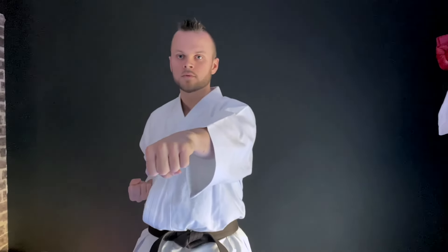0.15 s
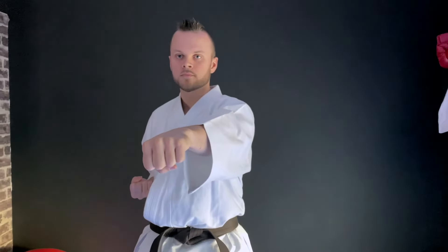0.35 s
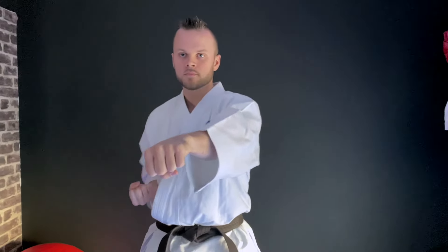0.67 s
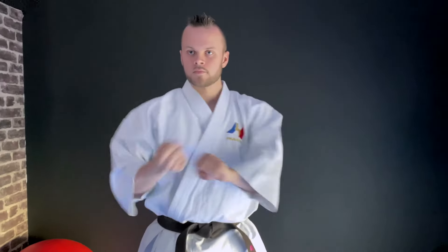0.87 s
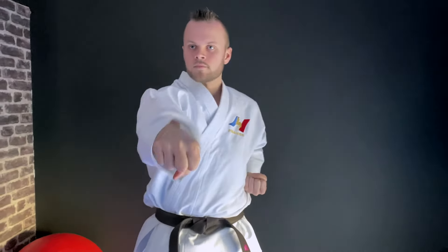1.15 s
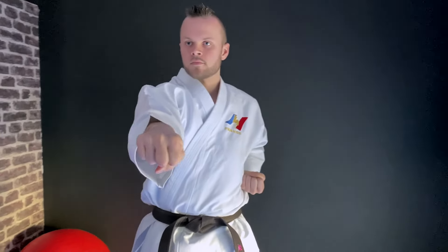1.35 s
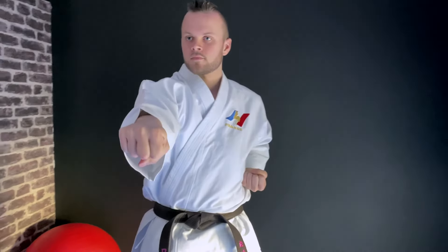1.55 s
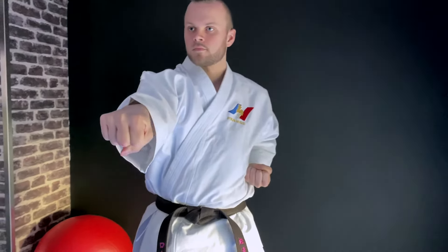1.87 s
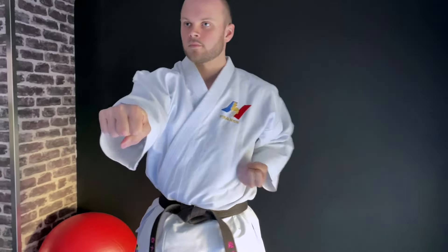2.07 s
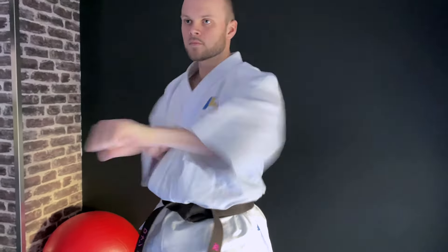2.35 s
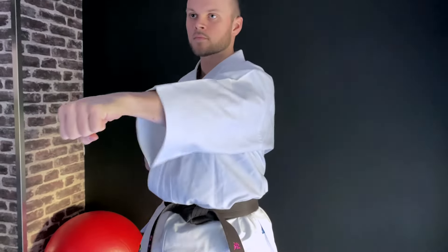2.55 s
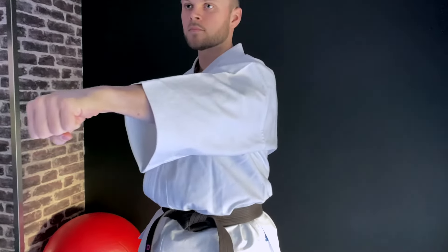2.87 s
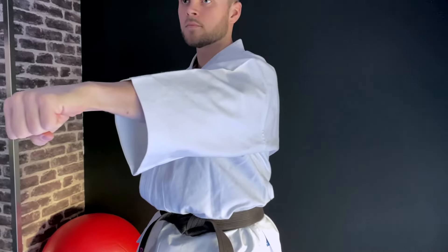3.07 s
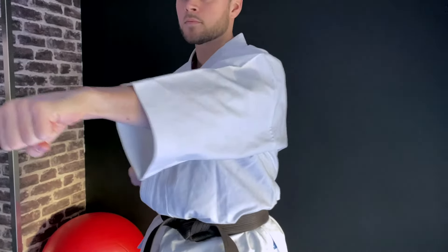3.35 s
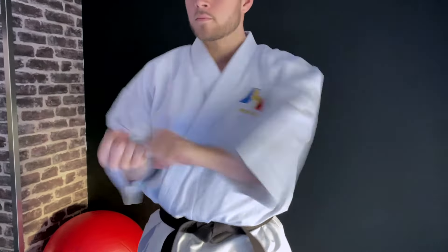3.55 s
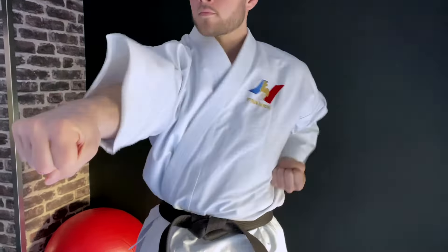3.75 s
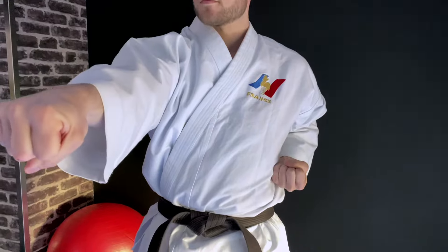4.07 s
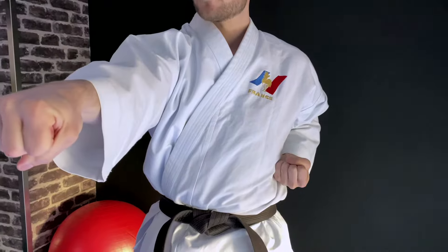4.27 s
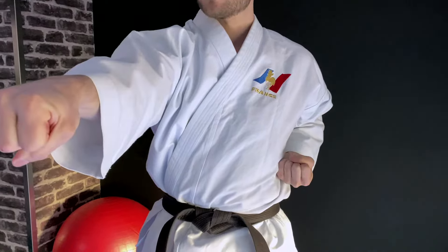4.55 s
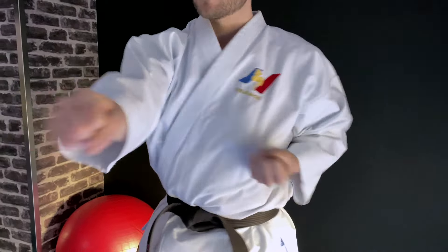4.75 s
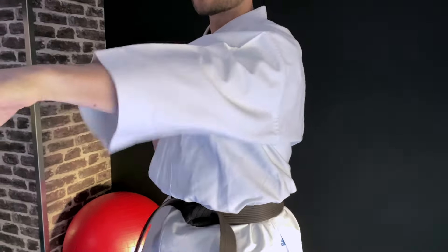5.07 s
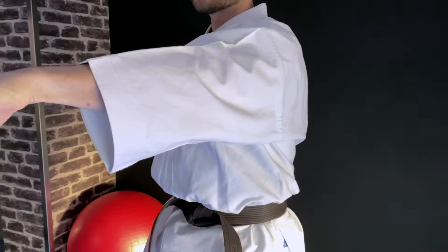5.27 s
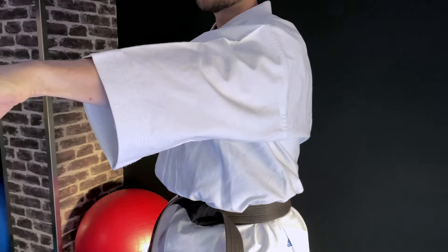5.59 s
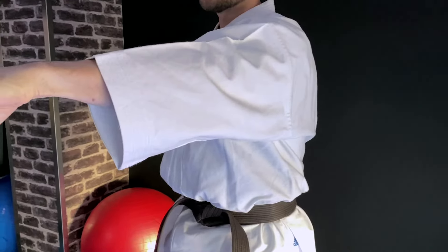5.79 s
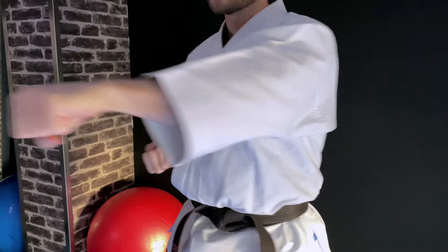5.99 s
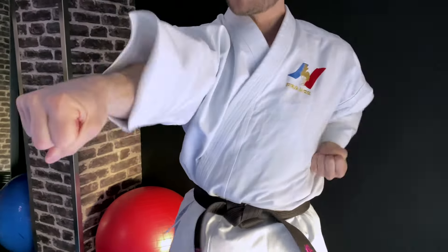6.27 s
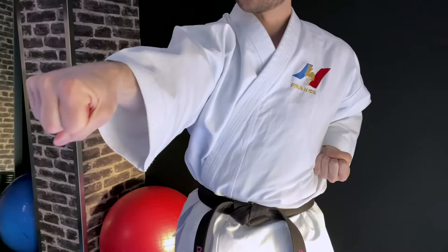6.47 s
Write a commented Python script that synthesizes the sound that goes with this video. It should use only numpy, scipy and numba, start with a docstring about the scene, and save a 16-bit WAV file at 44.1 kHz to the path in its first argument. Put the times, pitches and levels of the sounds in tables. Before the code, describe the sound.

Close up in a small, dull-sounding padded room, stiff cotton sleeves swish through five separate punches about a second or more apart. Each begins as coarse rubbing, swells fast, and ends in flapping folds and a dry snap with a soft low thump. Small rustles follow some of the punches. The fourth is the loudest, with hard pops and a deeper thud; quiet low rumble and recorder hiss fill the gaps.

```python
"""Five punches in a stiff cotton uniform, close by in a small padded room, over low rumble and recorder's hiss.
In each the weave rubs as dense coloured grains, sleeve folds flap and pop as damped sines, the arm scuffs through
gliding resonances, band-limited bursts snap or scuff, and damped low sines thump or make the rumble lumpier.
After the first punch faint thin tones pass; small shifts of pose rustle after the second, third and fourth.
The fourth punch brings the loudest pops and thump; the fifth settles into the rumble and hiss."""
import sys
import numpy as np
from scipy import signal
from scipy.fft import rfft, irfft
from scipy.io import wavfile
from scipy.ndimage import uniform_filter1d
from numba import njit

SR = 44100
rng = np.random.default_rng(int(sys.argv[2]) if len(sys.argv) > 2 else 0)


def unload_audio(sound):
    """Save the sound as a 16-bit wav file, at the path given as the first command line argument."""
    columns = np.transpose(np.atleast_2d(sound))
    # keep every value between -1 and 1, then stretch to whole-number steps
    steps = np.round(np.clip(columns, -1, 1) * 32767)
    wavfile.write(sys.argv[1], SR, steps.astype(np.int16))


N = 292383
T_S = np.arange(N) / SR

# arm speed per punch, as level of coarse rubbing: (time [s], level [dB])
ARM_SPEED = [
    [(0, -71), (.21, -95.5), (.52, -65.5), (.77, -52), (.83, -45), (.97, -42), (1.04, -42), (1.1, -48.5),
     (1.23, -62.5), (1.6, -77.5)],
    [(1.86, -80), (2.04, -57), (2.2, -49.5), (2.27, -47.5), (2.31, -39), (2.41, -36.5), (2.45, -41.5),
     (2.6, -58), (2.79, -76)],
    [(3.2, -88), (3.25, -69), (3.37, -55), (3.47, -50), (3.55, -39), (3.6, -35), (3.67, -38.5),
     (3.78, -49.5), (4.09, -79)],
    [(4.52, -84), (4.63, -56), (4.74, -48), (4.83, -41.5), (4.86, -35), (4.89, -33), (4.92, -39),
     (4.96, -33.5), (5.01, -42), (5.12, -53), (5.45, -82)],
    [(5.7, -80.5), (5.92, -55.5), (6.0, -54), (6.06, -43.5), (6.15, -40), (6.21, -36.5), (6.26, -42),
     (6.45, -60), (6.63, -75.5)],
]
# treble of the fine fibres per punch: (time [s], level [dB])
FIBRE_LEVEL = [
    [(0.3, -90), (0.606, -65), (0.78, -60.5), (0.826, -55.5), (1.038, -54.5), (1.338, -82), (1.4, -87)],
    [(1.87, -81), (2.06, -59.5), (2.248, -59), (2.316, -50.5), (2.394, -51.5), (2.624, -76), (2.72, -85)],
    [(3.2, -91), (3.304, -67.5), (3.448, -61), (3.564, -51.5), (3.628, -43.5), (3.85, -68.5), (4.05, -91)],
    [(4.52, -94), (4.628, -59), (4.712, -52.5), (4.842, -54), (4.904, -46.5), (4.974, -50.5), (5.25, -82)],
    [(5.75, -86), (5.84, -71), (6.18, -48.5), (6.194, -50), (6.232, -48.5), (6.282, -58.5), (6.55, -80)],
]
# phases of each punch: (thrust [s], full stretch [s],
#   folds in wind-up, at thrust, at stretch, settling [dB re rubbing at middle speed], tight weave in the same four [dB])
PUNCHES = [(0.815, 1.04, 1, 0, 2.6, 0, -7, -6.5, -4.5, -5.5),
           (2.303, 2.424, 1, 0.5, 0.83, -2, -4, -2, -3.5, -4.5),
           (3.562, 3.67, 3, 0.5, 3, 1, -4.5, -2.5, 0.5, -3.5),
           (4.831, 4.945, -2.5, -2, 3, 1, -3, -8, -0.5, -3),
           (6.054, 6.22, 1, 2.5, 1.9, 0.71, -5, -4.5, -4, -8)]
# small shifts of the held pose: (time [s], rise [s per 20 dB], fall [s per 20 dB],
#   rubbing [dB], folds [dB], tight weave [dB], fibres [dB])
POSE_SHIFTS = [(2.82, .025, .15, -69, -57.5, -72, -67.5), (4.27, 0.38, .15, -67.5, -79, -70.5, -74.5),
               (5.333, 0.026, 0.03, -83, -61, -76.5, -70)]
# folds popping open: (table time [s], peak [dB], starting pitch [Hz], decay to 1/e^2 [cycles])
FLAPS = [(0.799, -36, 654, 1.4), (0.819, -32.5, 810, 2.8), (0.929, -34.5, 510, 3.6),
         (0.964, -24.5, 295, 1.2), (0.977, -26.5, 620, 4.1), (1.019, -27, 607, 4.3),
         (1.039, -30.5, 730, 2.5), (2.226, -25, 530, 2.6), (2.26, -23, 466, 2.4), (2.343, -27, 500, 5.7),
         (2.384, -26, 224, 1.6), (2.82, -53, 473, 4.2), (2.845, -53, 520, 4), (3.335, -46, 300, 3.5),
         (3.375, -45, 280, 3.5), (3.403, -45, 416, 3.2), (3.546, -35.5, 410, 1.8), (3.61, -30, 596, 3.4),
         (3.689, -38, 590, 2.8), (3.754, -31.5, 670, 4.1), (3.798, -32.5, 433, 4.1),
         (4.812, -25.5, 450, 3.8), (4.846, -31.5, 641, 2.5), (4.932, -16, 428, 2.7),
         (4.944, -18.5, 288, 1.2), (4.955, -15, 660, 1.4), (4.99, -25, 196, 2), (5.196, -41, 413, 1.6),
         (6.029, -35, 727, 2.1), (6.064, -29, 715, 2.3), (6.088, -30, 426, 3.8), (6.114, -32, 506, 3.4),
         (6.149, -28, 470, 2.2), (6.179, -29, 670, 1.8), (6.231, -20, 795, 1.9), (6.406, -31.5, 760, 1)]
# short bursts of cloth, broad ones snap, narrow ones scuff:
#   (table time [s], peak [dB], centre [Hz], width [octaves], decay to 1/e [ms])
BURSTS = [(1.0263, -35, 2600, 3.1, 1.8), (2.2961, -25.5, 1550, 0.27, 7.4), (2.3105, -29, 1520, 0.3, 3.8),
          (2.3295, -28, 3670, 0.29, 3.7), (2.401, -20, 2580, 0.76, .8), (2.4282, -34, 2500, 1.2, 1.1),
          (2.7991, -48, 8000, 1.2, 3.1), (3.531, -44, 2300, 0.9, 2.3), (3.5511, -28, 2100, 1.2, 2.6),
          (3.599, -29, 2400, 1.1, 3.7), (3.6564, -25, 3200, 1.35, 2.9), (4.8494, -26.5, 2470, 0.56, 1.8),
          (4.8792, -19, 2780, 0.83, 3), (4.9628, -19, 1510, 2.6, 1.3), (4.9906, -18, 890, 0.83, 0.75),
          (5.3235, -52, 5500, 2.1, 3.1), (6.2018, -23, 1600, 1.8, 0.51), (6.229, -25, 1470, 1, 1.3)]
# arm sliding through the sleeve, the air gap ringing: (start [s], length [s], first [Hz], last [Hz], level [dB])
SCUFFS = [(0.782, 0.074, 556, 1120, -38), (0.838, 0.064, 1290, 2270, -42.5),
          (2.295, 0.036, 1600, 1600, -51), (2.815, 0.051, 6000, 7000, -79), (3.4, 0.065, 424, 390, -47),
          (3.577, 0.053, 2300, 2680, -31), (4.667, 0.058, 680, 680, -43.5), (4.723, 0.044, 450, 470, -38.5),
          (4.753, 0.07, 890, 2000, -40.5), (4.845, 0.075, 1500, 3600, -35),
          (5.32, 0.039, 4000, 4250, -68.5), (6.02, 0.081, 680, 960, -43)]
# low thumps and lumps in the rumble: (table time [s], peak [dB], starting pitch [Hz], decay to 1/e^2 [cycles])
THUMPS = [(0.908, -45, 96.9, 3.0), (0.93, -41, 56.5, 4.6), (1.178, -49, 72.7, 2.7),
          (1.321, -48.5, 114, 2.6), (1.419, -46, 37, 2.1), (1.529, -54, 37.2, 2.7), (1.654, -44, 65, 3.7),
          (1.719, -47, 71.4, 1.9), (1.675, -45, 55, 2.0), (1.907, -46.5, 64.6, 6), (1.965, -46, 55, 2.0),
          (2.105, -46, 40, 2.0), (2.025, -37.5, 60.4, 2), (2.334, -37, 80, 2.7), (2.719, -49, 38, 3.0),
          (2.769, -46.5, 57, 2.9), (2.819, -53, 45.8, 2.8), (3.119, -46.5, 40.7, 2.3),
          (3.18, -55, 48.7, 2.3), (3.249, -50, 45.8, 2.2), (3.589, -43, 128, 4), (4.316, -41, 58, 3),
          (4.915, -23, 96.3, 6.3), (4.949, -35, 69.5, 3.8), (5.45, -53.5, 67, 2.2), (6.089, -33, 129, 3.3),
          (6.227, -33.5, 71.4, 1.9)]
# floor rumble, swelling around the punches; a part following the rubbing is added: (time [s], level [dB])
RUMBLE_LEVEL = [(0.0, -70), (0.81, -66), (1.03, -46), (1.09, -52), (2.31, -60), (2.36, -47), (2.62, -68),
                (2.79, -54.5), (2.92, -63.5), (3.67, -53.5), (4.1, -69.5), (4.32, -58.5), (4.63, -66),
                (4.95, -47), (5.22, -66), (5.76, -71), (6.22, -51), (6.63, -73.5)]
# faint thin tones: (start [s], length [s], first [Hz], last [Hz], level before the envelope [dB])
TONES = [(1.326, 0.45, 906, 890, -75), (1.59, .09, 2800, 2860, -86), (1.67, .06, 2860, 2900, -73)]
# relative spectra of coarse weave, tight weave, folds, fibres, floor, hiss: (frequency [Hz], density [dB per Hz])
WEAVE_SPECTRUM = [(650, 3.5), (1150, 3.5), (2050, 1.5), (2700, -6), (3400, -37)]
TIGHT_SPECTRUM = [(2300, -7), (2900, -1), (3500, -1), (4150, -0.2), (4650, -4.5), (5200, -9), (6600, -17.5)]
FOLD_SPECTRUM = [(90, -2), (170, 0), (300, 2), (480, 2), (750, -2), (1100, -10), (1600, -11)]
FIBRE_SPECTRUM = [(4000, -4), (5500, -10), (8000, -9.5), (11000, -16), (15500, -18)]
FLOOR_SPECTRUM = [(15, 14), (30, -2.5), (55, 2), (90, -6.5), (160, -18), (400, -33)]
HISS_SPECTRUM = [(88, -43), (150, 0), (359, -9.5), (530, -12.5), (751, -14), (1000, -13.5), (1420, -15.5),
                 (15500, -26)]

MIDDLE_DB = -50  # rubbing at middle speed
FOLDS_GROW_DB_PER_DB, TIGHT_GROW_DB_PER_DB = 0.12, -.05  # gain re rubbing per dB of speed
BLEND_S = 0.044  # wind-up to thrust, stretch to settling
FLAP_DELAY_S = 0.00296  # table time to start of sound
SCUFF_Q = 7.2
ROOM_T60_S, ROOM_DB, ROOM_HZ = 0.38, -15.5, 5070
SWAY_DB, SWAY_GROW_DB_PER_DB = -65.5, 0.58  # rumble following the rubbing: at middle speed; growth with speed
HISS_DB, TOP_HZ = -70, 15710


def arm():
    """Speed and phase set rubbing, folds and tight weave; fibres follow their own curve; pose shifts add to all."""
    gains = np.zeros((4, N))
    for speed_curve, fibre_curve, (thrust_s, stretch_s, *phase_db) in zip(ARM_SPEED, FIBRE_LEVEL, PUNCHES):
        rub_db = fading(speed_curve)
        speed_db = rub_db - MIDDLE_DB
        phases_s = [thrust_s - BLEND_S, thrust_s, stretch_s, stretch_s + BLEND_S]
        folds_db, tight_db = (np.interp(T_S, phases_s, db) for db in np.reshape(phase_db, (2, 4)))
        folds_db = rub_db + folds_db + FOLDS_GROW_DB_PER_DB * speed_db
        tight_db = rub_db + tight_db + TIGHT_GROW_DB_PER_DB * speed_db
        gains += undb([rub_db, folds_db, tight_db, fading(fibre_curve)])
    for s, rise_s, fall_s, *peak_db in POSE_SHIFTS:
        drop_db = 20 * np.maximum((s - T_S) / rise_s, (T_S - s) / fall_s)
        gains += undb(np.array(peak_db)[:, None] - drop_db)
    return gains


def sleeves(gains):
    """Stick-slip of weave, folds and fibres: coloured grains, each patchy in its own way."""
    drag = walk(45)  # shared: the sleeve catches and lets go
    slips = grains(2500, 5.6, 1.0)
    coarse = colour(slips, WEAVE_SPECTRUM) * undb(0.74 * drag + 0.71 * walk(90))
    tight = colour(slips, TIGHT_SPECTRUM) * undb(0.49 * drag + 1.2 * walk(80))
    folds = colour(grains(400, 7.3, 1.0), FOLD_SPECTRUM) * undb(1.8 * drag + 0.6 * walk(35))
    fibres = colour(grains(5000, 7.3, 4.1), FIBRE_SPECTRUM) * undb(0.11 * drag + 0.64 * walk(70))
    return np.sum(gains * np.array([coarse, folds, tight, fibres]), axis=0)


def scuffs():
    """Slips ring the air gap of the sleeve: a gliding resonance, swelling and fading with each slide."""
    hz, gain = np.full(N, 1000.), np.zeros(N)
    for s, length_s, first_hz, last_hz, db in SCUFFS:
        i, n = int(s * SR), int(length_s * SR)
        hz[i:i + n] = np.geomspace(first_hz, last_hz, n)
        gain[i:i + n] = undb(db) * np.sqrt(np.hanning(n))
    slips = grains(1500, 5.4, -1.3) * gain
    ring = resonate(slips / np.sqrt(hz), hz, SCUFF_Q)
    return ring * np.sqrt(SR * SCUFF_Q / np.pi / 2)  # with / sqrt(hz): makes up for the narrow band hz / Q


def flaps():
    """Folds pop open; each air pocket sinks slightly in pitch as it opens."""
    return pops(FLAPS, glide=0.047, delay_s=FLAP_DELAY_S)


def bursts():
    """Short bursts of cloth, decaying noise each in its own band: broad ones snap, narrow ones scuff."""
    out, ms = np.zeros(N), np.arange(1024) * 1000 / SR
    noises = rng.standard_normal((len(BURSTS), 1024))
    for (s, db, hz, octaves, decay_ms), noise in zip(BURSTS, noises):
        edge = 2 ** (octaves / 2)
        band = signal.butter(2, [hz / edge, hz * edge], "band", fs=SR)
        burst = signal.lfilter(*band, noise * np.exp(-ms / decay_ms))
        add(out, s + FLAP_DELAY_S / 2, undb(db) * burst / np.abs(burst).max())
    return out


def room(x):
    """Dense dull reflections: low-passed noise decaying exponentially, starting after 6 ms."""
    t_s = np.arange(SR // 2) / SR
    decay = np.exp(-np.log(1000) * t_s / ROOM_T60_S)
    tail = rng.standard_normal(len(t_s)) * decay * (t_s > .006)
    tail = signal.lfilter(*signal.butter(2, ROOM_HZ, fs=SR), tail)
    return signal.fftconvolve(x, tail / np.linalg.norm(tail))[:N] * undb(ROOM_DB)


def thumps():
    """Low thumps and lumps in the rumble: low damped cycles, sinking strongly in pitch."""
    return pops(THUMPS, glide=0.34, delay_s=0.0124)


def rumble(rubbing_gain):
    """Lumpy low noise, swelling around the punches, with a part that follows the rubbing."""
    sway = undb(SWAY_DB) * (rubbing_gain / undb(MIDDLE_DB)) ** SWAY_GROW_DB_PER_DB
    gain = undb(np.interp(T_S, *np.transpose(RUMBLE_LEVEL))) + sway
    return colour(rng.standard_normal(N), FLOOR_SPECTRUM) * gain * undb(3.5 * walk(15))


def tones():
    """Thin sines with wavering, drifting pitch, swelling and fading, weighted to their first half."""
    out = np.zeros(N)
    for s, length_s, first_hz, last_hz, db in TONES:
        n = int(length_s * SR)
        hz = np.linspace(first_hz, last_hz, n) * (1 + .006 * walk(32)[:n])
        envelope = np.sqrt(np.hanning(n)) * np.linspace(1.5, .6, n)
        add(out, s, undb(db) * envelope * np.sin(2 * np.pi * np.cumsum(hz) / SR))
    return out


def recorder_hiss():
    """Steady coloured noise."""
    return colour(rng.standard_normal(N), HISS_SPECTRUM) * undb(HISS_DB)


def pops(table, glide, delay_s):
    """A few swelling and dying cycles, sinking in pitch, each starting delay_s after its table time."""
    out = np.zeros(N)
    for s, db, hz, cycles in table:
        turn = np.arange(int(5 * cycles * SR / hz)) * hz / SR
        envelope = (1 - np.exp(-turn / 0.16)) * np.exp(-2 * turn / cycles)
        phase = turn * (1 - glide * turn / (5 * cycles))
        add(out, s + delay_s, undb(db) * envelope / envelope.max() * np.sin(2 * np.pi * phase))
    return out


def grains(rate_hz, range_db, smooth_db):
    """Stick-slip clicks of scattered size and sign, rms 1, over smooth noise at smooth_db."""
    chance, size = rng.random((N, 2)).T
    clicks = (chance < rate_hz / SR) * undb(range_db * size) * rng.standard_normal(N)
    return clicks / clicks.std() + undb(smooth_db) * rng.standard_normal(N)


@njit
def resonate(x, hz, q):
    """State-variable band-pass with a moving centre, gain 1 there."""
    y, band, low = np.empty(len(x)), 0., 0.
    for i in range(len(x)):
        g = np.tan(np.pi * hz[i] / SR)
        v = (band + g * (x[i] - low)) / (1 + g * (g + 1 / q))
        band, low, y[i] = 2 * v - band, low + 2 * g * v, v / q
    return y


def colour(x, points):
    """Shape by (Hz, dB) points on a log axis, falling away beyond both ends; rms 1."""
    hz, db = np.transpose(points)
    log_f = np.log(np.maximum(np.arange(N // 2 + 1) * SR / N, 1))
    outside = np.maximum(np.log(hz[0]) - log_f, 0) + np.maximum(log_f - np.log(hz[-1]), 0)
    y = irfft(rfft(x) * undb(np.interp(log_f, np.log(hz), db) - 96 * outside), N)
    return y / y.std()


def walk(rate_hz):
    """Random levels, a new one every 1 / rate_hz, joined by ramps; spread near 0.8."""
    k = int(SR / rate_hz)
    return uniform_filter1d(np.repeat(rng.standard_normal(N // k + 1), k), k)[:N]


def fading(curve):
    """Level curve [dB] that comes up from -110 dB and returns to it."""
    s, db = np.transpose(curve)
    return np.interp(T_S, np.r_[s[0] - .15, s, s[-1] + .3], np.r_[-110, db, -110])


def undb(db):
    """Gain of a level in dB."""
    return 10 ** (np.asarray(db) / 20)


def add(out, s, shape):
    """Mix a short sound in at time s."""
    i = int(s * SR)
    out[i:i + len(shape)] += shape[:len(out) - i]


def scene():
    """Cloth and its echo, floor, tones, hiss."""
    gains = arm()
    cloth = sleeves(gains) + scuffs() + flaps() + bursts()
    floor = thumps() + rumble(gains[0])
    return (cloth + room(cloth) + floor + tones() + recorder_hiss())[None]


def record(dry):
    """Steep elliptic low-pass at the top of the band."""
    return signal.sosfilt(signal.ellip(12, .2, 80, TOP_HZ, fs=SR, output="sos"), dry)


dry = scene()
out = record(dry)
unload_audio(out)
```